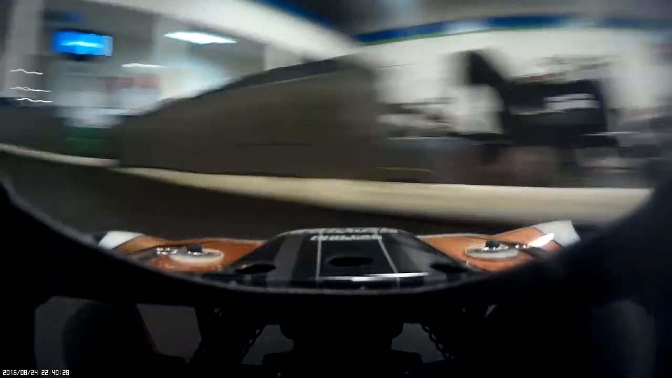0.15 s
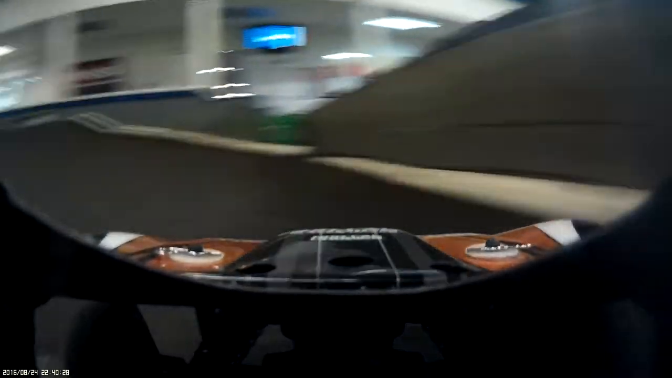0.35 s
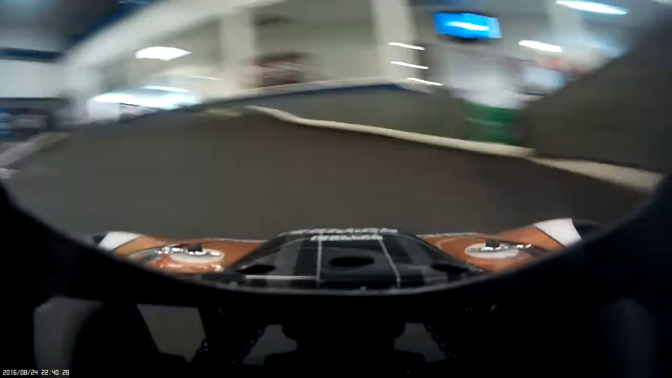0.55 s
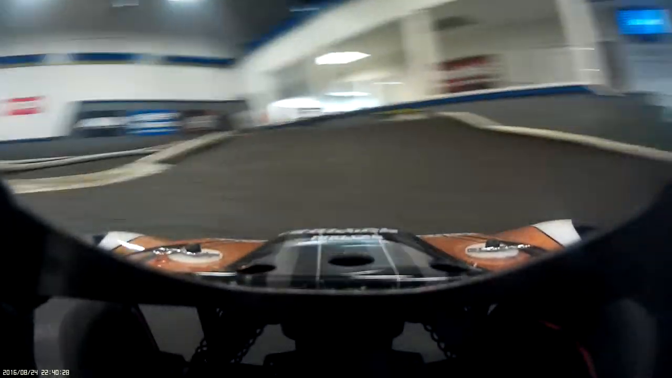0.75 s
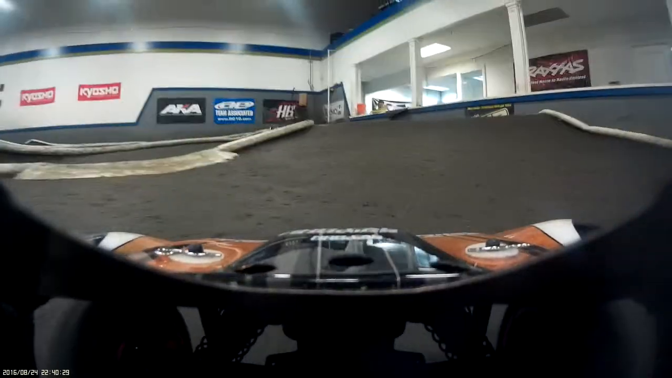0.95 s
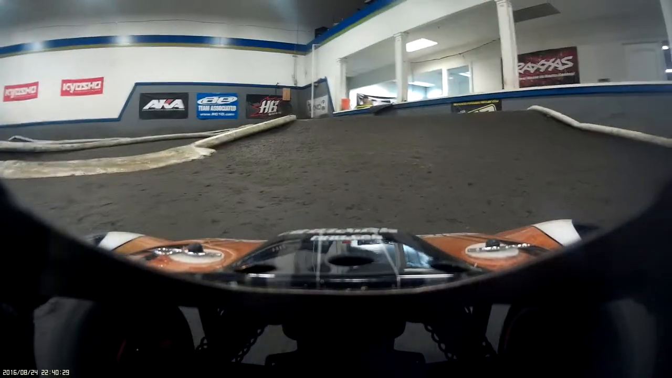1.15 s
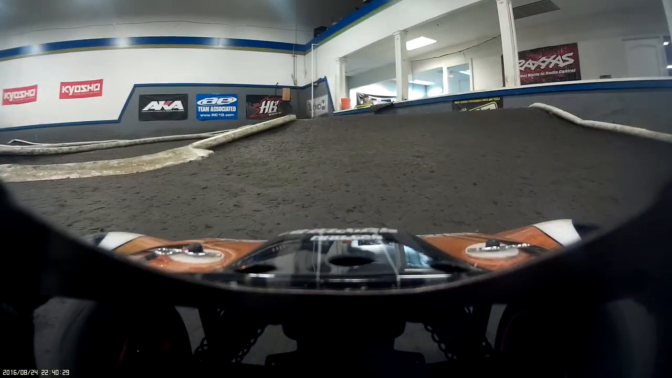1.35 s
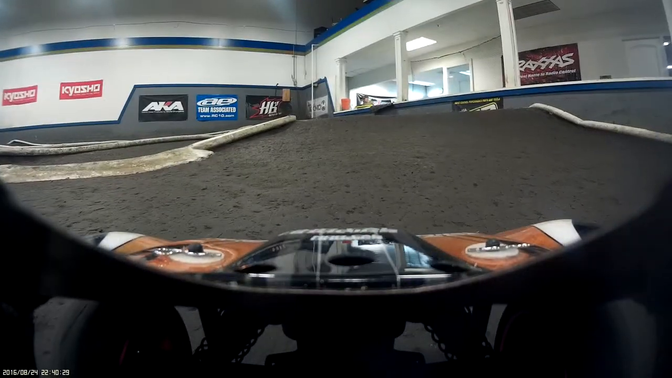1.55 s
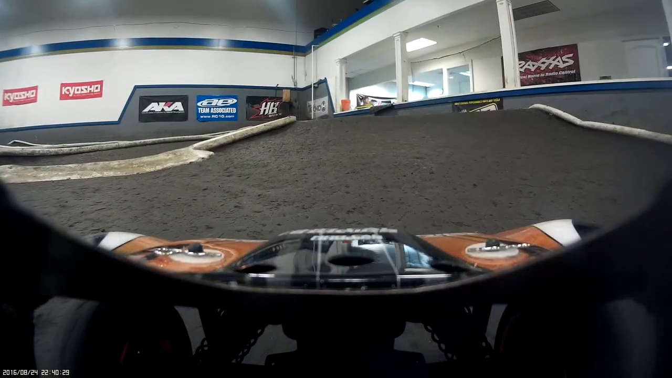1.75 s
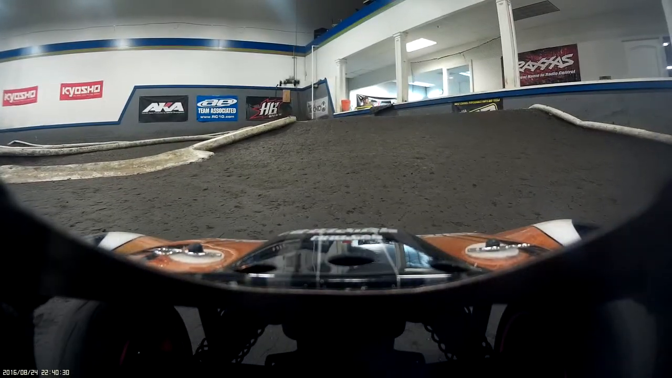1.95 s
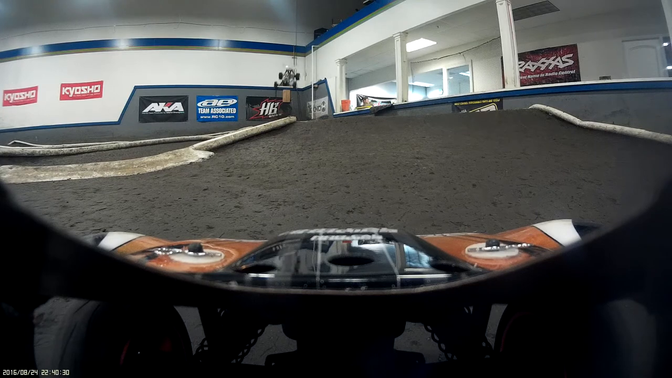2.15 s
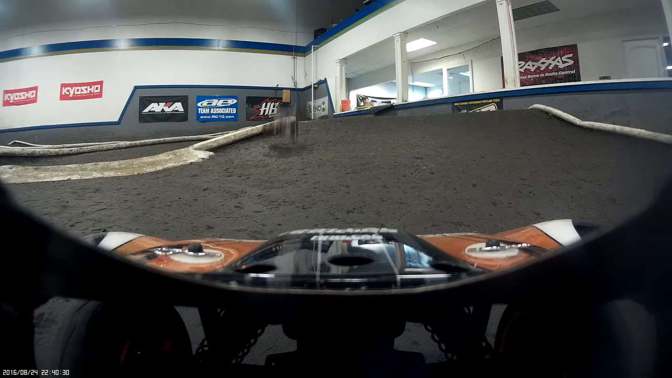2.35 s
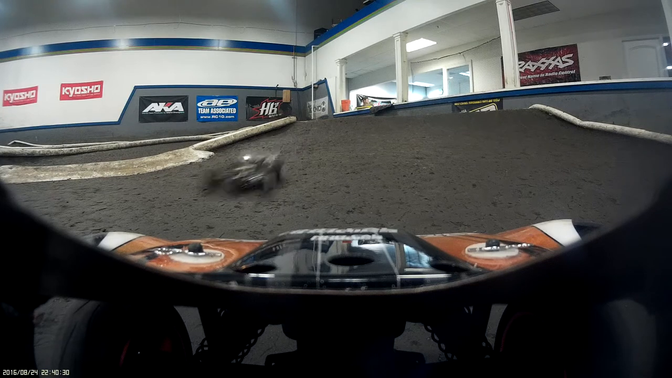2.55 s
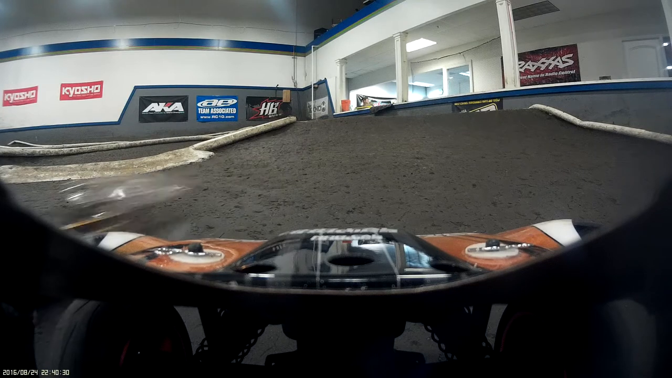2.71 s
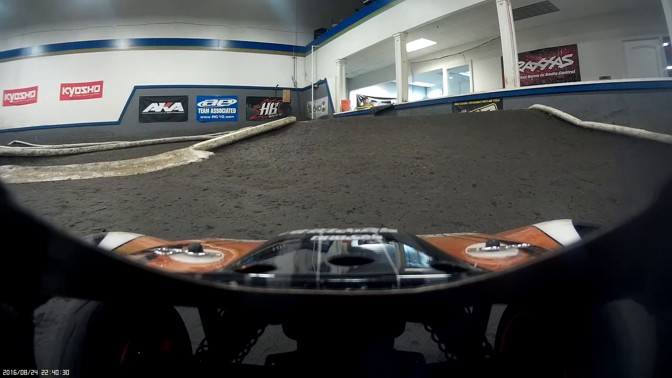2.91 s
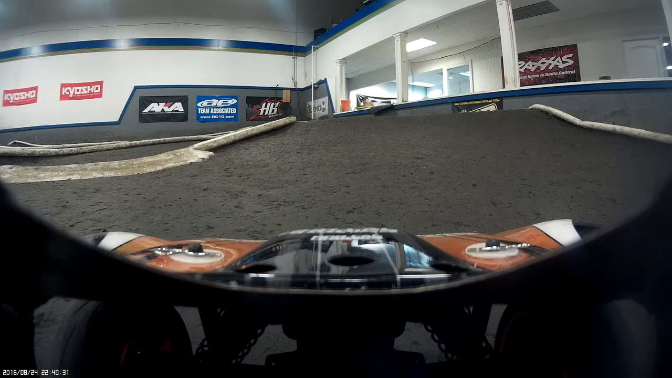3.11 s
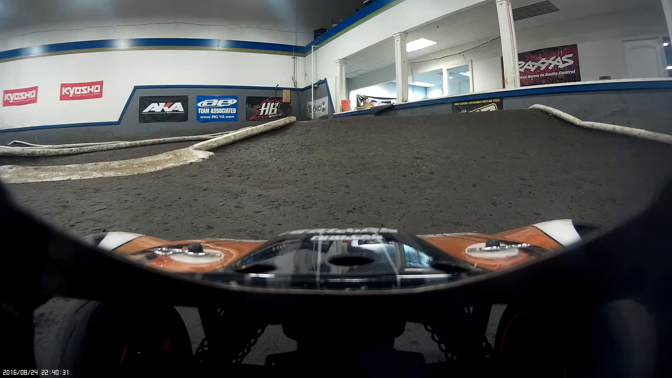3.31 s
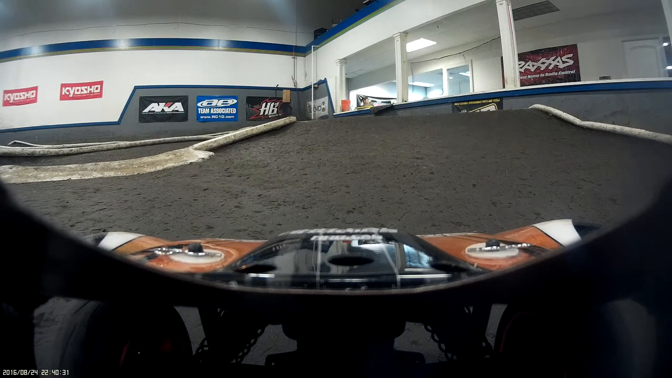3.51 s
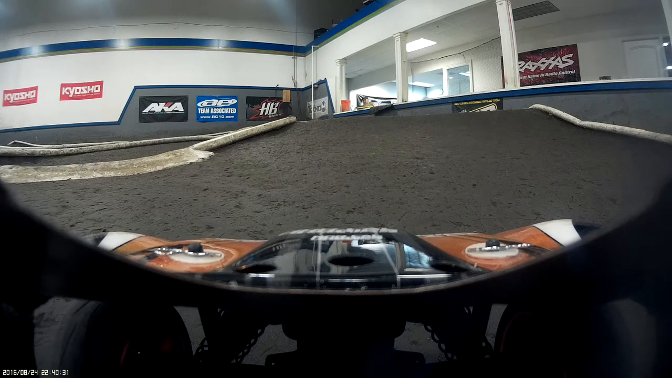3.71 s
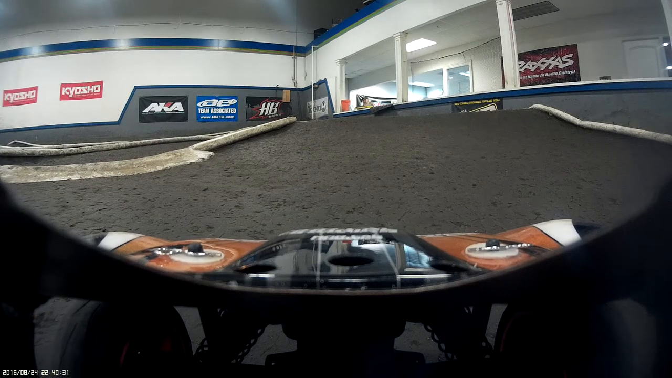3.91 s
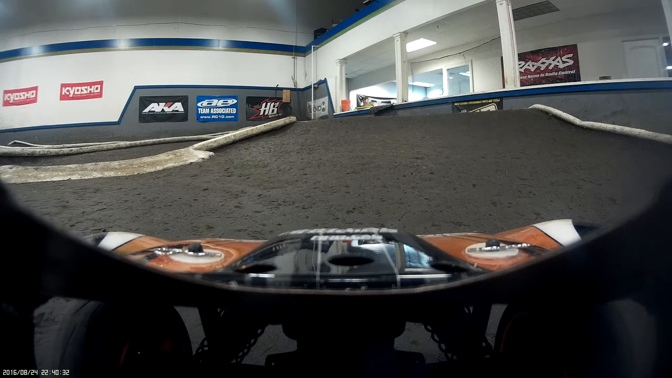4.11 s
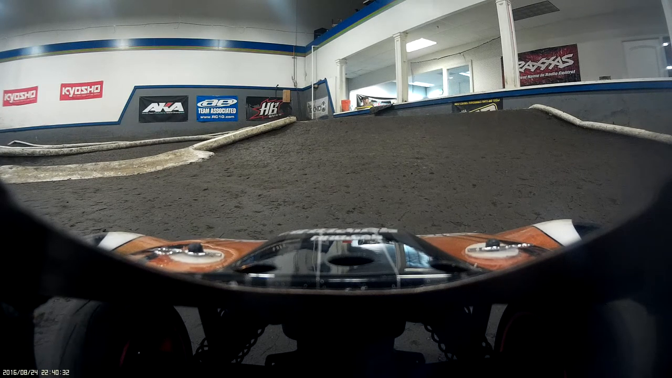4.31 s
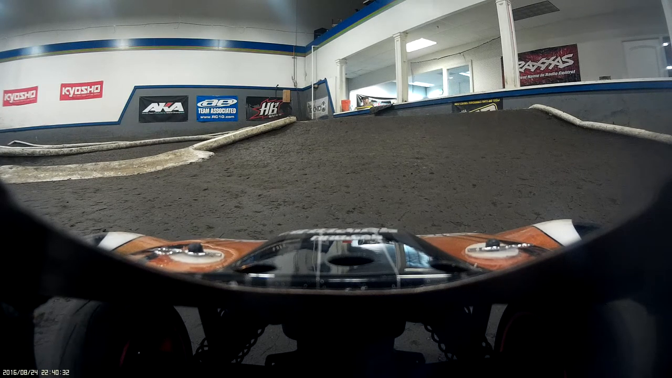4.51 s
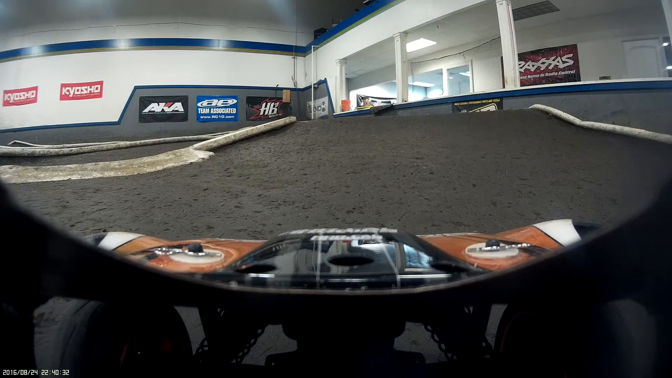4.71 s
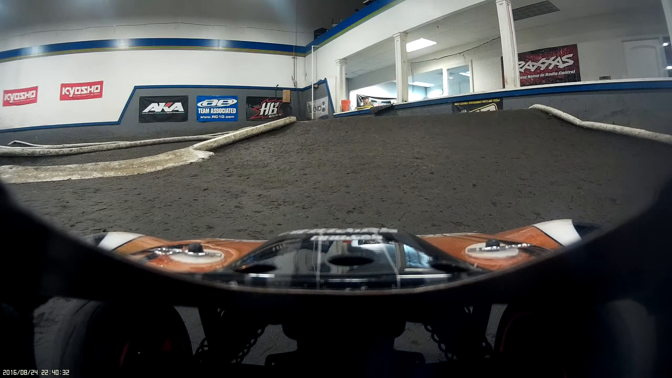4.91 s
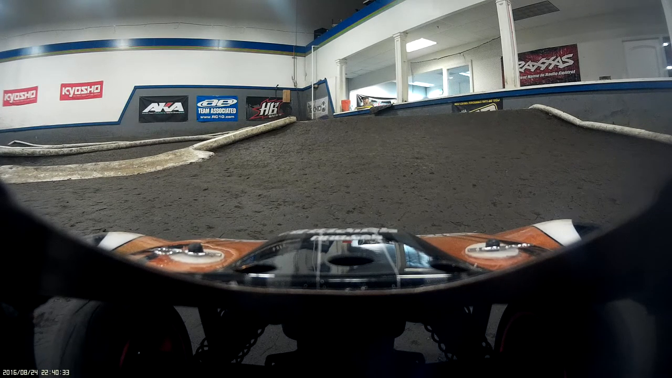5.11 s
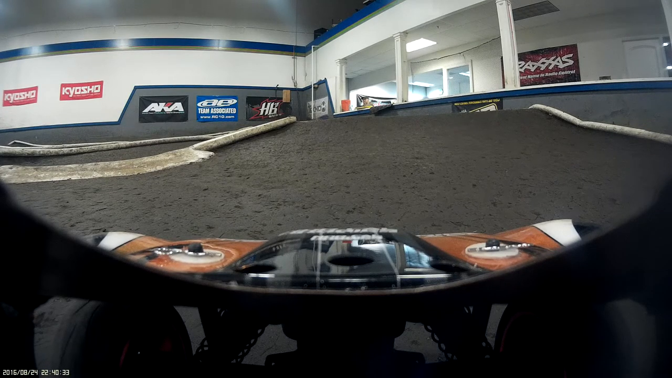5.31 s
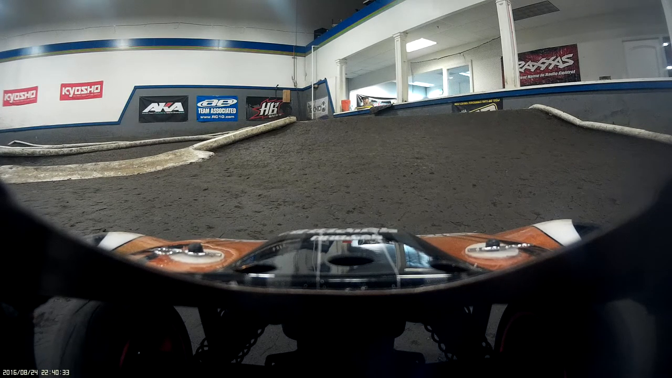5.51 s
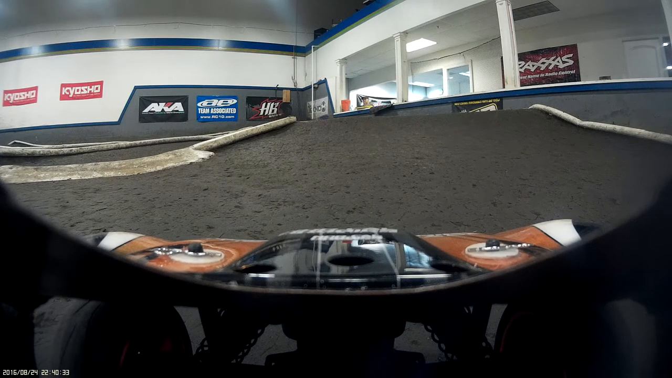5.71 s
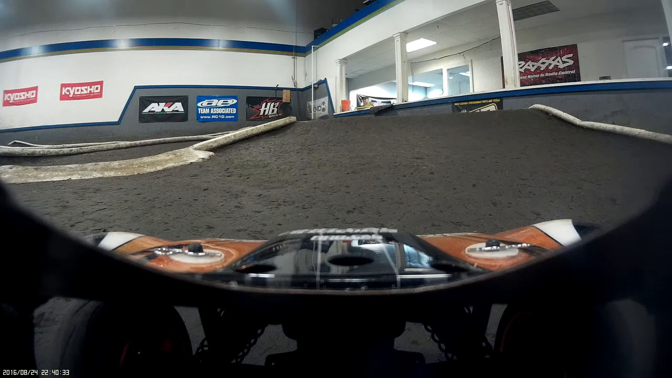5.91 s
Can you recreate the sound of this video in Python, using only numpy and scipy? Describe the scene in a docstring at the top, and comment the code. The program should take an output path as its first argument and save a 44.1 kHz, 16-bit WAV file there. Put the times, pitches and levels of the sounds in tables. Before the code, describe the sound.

Close on the roof of a small electric buggy on an indoor dirt track: booming wind, knocks, rattling grit and shrill gear whine, then a falling whine and braking buzz. The servo chatters briefly and quiet fans hiss. Around 2.5 seconds another buggy thumps down, then cracks against the shell, chirps, and whines away into the hall, leaving faint fan noise.

```python
"""On board an electric model buggy on an indoor dirt track, close-miked by the camera on its roof.
At first wind noise buffets the microphone, grit rattles on the chassis and the gears whine as turning partials.
The buggy then brakes with a motor buzz, its steering servo chatters, and its two fans hum and hiss as it stands.
Then a second buggy lands nearby and clips the shell: shaped noise and ringing plate modes.
Last it whines away in gliding gear tones, with a noise tail for the hall around it."""
import sys
import numpy as np
from scipy import signal
from scipy.fft import rfft, irfft, next_fast_len
from scipy.io import wavfile
from scipy.ndimage import map_coordinates

SR = 44100
rng = np.random.default_rng(int(sys.argv[2]) if len(sys.argv) > 2 else 0)


def wav_record(signal):
    """Record a signal, one row per channel, as 16-bit PCM in the file named by sys.argv[1]."""
    frames = np.transpose(np.atleast_2d(signal))
    bounded = np.clip(frames, -1, 1)
    # unit amplitude maps onto the largest positive 16-bit level
    quanta = np.round(bounded * 32767).astype(np.int16)
    wavfile.write(sys.argv[1], SR, quanta)


N = 262571

# ground speed of the buggy carrying the microphone: (time [s], share of top speed)
GROUND_SPEED = [(0, 0.68), (.14, 0.83), (.33, 0.94), (.54, 0.61), (.67, 0.73), (.74, .4), (.94, 0.34),
                (1.06, 0.15), (1.45, 0.016)]

# wind noise at the microphone: (frequency [Hz], density [dB per Hz])
WIND_SPECTRUM = [(9.4, -27), (16, 11.5), (32, -4), (71, 0), (117, -7), (204, -24), (600, -34), (780, -62),
                 (1320, -120)]
# dull knock as the suspension bottoms out: (frequency [Hz], density [dB per Hz])
KNOCK_SPECTRUM = [(40, -9), (130, 3.5), (260, -8.5), (500, -22), (900, -26), (2000, -57)]
# the suspension bottoms out: (time [s], slow push [dB], push frequency [Hz], knock [dB])
BOTTOMINGS = [(0.127, 2.5, 82, -8), (.312, 4, 33, -7), (0.375, 4.5, 27.3, -18), (0.403, -14, 46.2, -5),
              (.446, -4, 55.5, -29), (0.474, 1, 83, -23), (.506, 3.5, 44.7, -20), (0.537, -4, 49.7, -14),
              (.662, -9.5, 59.6, -20), (2.764, -29, 40, -31)]
WIND_DB, WIND_POWER = -10.5, 3.07  # mean gust at top speed; grows as this power of speed
GUST_DB, GUST_RATE = 3, 22.33  # scale of the wind's lumps [dB], random lumps per second
DIAPHRAGM_TRAVEL = .72  # soft limit of the wind and knocks [full scale]

# grit drumming on the chassis: (frequency [Hz], density [dB per Hz])
CHASSIS_SPECTRUM = [(210, -28.5), (350, -21), (633, -22.5), (707, -13.5), (734, -17), (798, -8.5), (996, 3),
                    (1320, -5.5), (1460, -1.5), (1840, -7.5), (2090, -15), (3200, -42), (4160, -54),
                    (7040, -120)]
# grit spraying off the chassis: (frequency [Hz], density [dB per Hz])
GRIT_SPECTRUM = [(1500, -44), (2200, -11), (3000, 0), (3260, -4.5), (3930, 4), (4480, -7), (5450, 5.5),
                 (6470, -3.5), (8400, -11), (9500, -27), (13000, -16), (15500, -15)]
# ruts shake the chassis: (time [s], rattle level [dB], swell length [s])
RUT_RATTLES = [(.005, -15, 0.019), (.117, -11.5, 0.023), (.38, -12, 0.0025), (.456, -17.5, 0.0061),
               (.49, -12.5, 0.014), (.539, -20, 0.0027), (.614, -13, 0.0055), (.654, -12.5, 0.012),
               (.739, -12, 0.02), (.811, -15, 0.024), (.855, -13, 0.025), (1.104, -23, 0.01),
               (1.178, -19, 0.017), (1.25, -25, 0.014), (1.376, -26.5, 0.0043), (1.418, -13, 0.0011)]
RATTLE_POWER, SPRAY_POWER = 0.38, 1.18  # the tyre noises grow as these powers of speed
ROLL_DB, SPIN_DB, SCRUB_DB = -21.5, -21, -18  # rattle gains for rolling, wheelspin and braking, at top speed
ROLL_SPRAY_DB, SPIN_SPRAY_DB, SCRUB_SPRAY_DB = -28.5, -20.5, -18  # spray gains for the same three

# the driver's commands: (start [s], end [s], attack [s], release [s])
THROTTLE = (0.095, 0.338, .014, 0.036)
FULL_POWER = (0.14, 0.279, 0.033, 0.01)
BRAKING = (0.758, 1.5, 0.093, 0.13)
STEERING = (1.25, 1.81, 0.57, 0.016)

# gear mesh under throttle, flaring as the wheels hop: (time [s], pitch [Hz])
MESH_PITCH = [(.1, 1480), (.117, 1679), (.13, 1030), (.143, 1517), (.172, 1236), (.192, 1231), (.222, 1618),
              (.252, 1240), (.279, 1434), (.31, 1170)]
# gear partials under throttle: (multiple of mesh pitch, level [dB])
GEAR_PARTIALS = [(1, 0), (2, -13.5), (4, -20)]
# motor buzz under braking: (multiple of buzz pitch, level [dB])
BRAKE_PARTIALS = [(1, -2.5), (2, 1.5), (4, -19), (5, -31), (7, -13)]
WHINE_DB, WHISTLE_DB = -12, -19.5  # gears and speed controller under power
RUN_DOWN = (.84, 1.053, .025, 0.12)  # gears sing while slowing: start, end, attack, release [s]
CREST_S, CREST_HZ, RISE_HZ_PER_S, SAG_HZ_PER_S = .892, 1285, 4000, 3550  # their pitch crests, then sags
RUN_DOWN_DB = -13.5
BRAKE_DB, BRAKE_FADE_DB_PER_S = -24, 10  # the pulsed brake buzzes in the motor

# resonances of the servo case: (frequency [Hz], width [Hz], level [dB])
SERVO_MODES = [(1460, 48, 9), (2056, 51, 6.5), (2560, 150, -13), (6900, 100, -1), (7600, 100, -5),
               (8050, 110, -16)]
SERVO_DB = -23  # at full effort

# the other buggy strikes the ground, then the shell: (time [s], thud [dB], crack [dB], 60 dB decay [s])
STRIKES = [(2.435, -23.5, -12.5, 0.16), (2.451, -15, -21, 0.17), (2.475, -24.5, -26, 0.12),
           (2.762, 0, -8, 0.031), (2.782, -39, -38, 0.031)]
# chassis plate modes: (frequency [Hz], level before a small scatter [dB], 60 dB decay [s])
PLATE_MODES = [(135, -19, 0.12), (337, -10.5, 0.082), (488, -5, 0.055), (613, -5, 0.04), (685, 3, 0.043),
               (1200, -6, 0.013)]
# scuffed dirt, also the rumble of the passing buggy: (frequency [Hz], density [dB per Hz])
DIRT_THUD = [(50, -60), (90, -16), (140, -2), (220, -15), (330, -2), (480, -5), (660, -4.5), (900, -1),
             (1250, -6.5), (2000, -6), (6000, -42)]
# crack of the plastic shell: (frequency [Hz], density [dB per Hz])
SHELL_CRACK = [(100, -67), (400, -12), (1300, -9), (1900, 4), (2700, -13), (4000, -3), (6000, -10),
               (9000, -20), (15000, -15)]

# throttle blips of the other buggy:
# (time [s], pitch [Hz], glide [Hz per s], swell length [s], level [dB], roughness [share])
THROTTLE_BLIPS = [(2.779, 2200, -15000, 0.012, -18, .6), (2.826, 1950, 0, 0.023, -12.5, 1.06),
                  (2.873, 2080, -7000, .022, -19, 0.25), (2.953, 2060, 7000, 0.02, -21.5, 0.44),
                  (3.022, 2080, 5002, 0.02, -21, 0.6), (3.084, 1560, 2, .03, -25, 0.18),
                  (3.25, 1400, 0, 0.019, -21, 0.23), (3.3, 1518, 1999, 0.017, -23, .2),
                  (3.856, 2746, -5000, 0.038, -23.5, 0.29), (5.21, 1700, 1400.5, 0.038, -22.5, 0.2)]
BLIP_DRIFT = .07  # pitch scatter at a roughness of 1
# its gear mesh as it pulls away: (time [s], pitch [Hz])
PULL_AWAY_PITCH = [(3.34, 1850), (3.42, 1940), (3.47, 2110), (3.55, 3400), (3.575, 2960), (3.595, 2880),
                   (3.65, 2520)]
# its body rings louder at some gear pitches: (pitch [Hz], gain [dB])
RIVAL_BODY_GAIN = [(1900, 1.5), (2150, -0.5), (2550, -1), (2880, 2), (3050, -4), (3400, -7)]
# its tyres spray dirt: (time [s], level [dB], swell length [s])
DIRT_SKIDS = [(2.808, -16, 0.012), (2.832, -18, 0.011), (2.866, -24, 0.02), (3.54, -25.5, 0.079),
              (3.855, -27, .04)]
# dirt thrown by those tyres: (frequency [Hz], density [dB per Hz])
DIRT_SPRAY = [(3000, -36), (4500, -2), (5200, 6), (6200, 0.5), (7200, -24), (14000, -43)]
# the other buggy's phases: (start [s], end [s], attack [s], release [s])
NEARBY = (2.47, 3.34, .04, 0.39)  # rolling within earshot
RIVAL_BRAKING = (2.795, 3.08, 0.015, 0.023)
PULL_AWAY = (3.33, 3.67, .025, 0.086)
PULL_DB = -27.5  # before the body gain
PASS_S, PASS_WIDTH_S, PASS_DB = 2.752, 0.048, -24  # closest approach, time to cover that distance, rumble there
RIVAL_BRAKE_DB, RIVAL_BRAKE_FADE_DB_PER_S = -25, 55

# how plainly the fans are heard: (time [s], gain [dB])
FAN_GAIN = [(0, -1), (1.1, -12), (1.5, 1.5), (5.95, 0.44)]
# first fan's hum: (multiple of its pitch, level [dB])
FAN_PARTIALS = [(1, -46), (4, -40), (5, -36.5), (6, -39), (10, -45)]
# second, smaller fan's hum: (multiple of its pitch, level [dB])
SMALL_FAN_PARTIALS = [(.5, -61.5), (1, -50), (1.5, -55), (3.5, -65)]
# fan draught: (frequency [Hz], density [dB per Hz])
FAN_DRAUGHT = [(25, -16), (45, -19), (76, -5), (110, -11), (170, -8), (330, -11.5), (480, -1.5), (900, 1),
               (1300, -7.5), (2300, -2), (3000, -1.5), (9000, -15), (15000, -10)]
# cavity under the body shell: (frequency [Hz], width [Hz], level [dB])
SHELL_CAVITY = [(1490, 126, 3.5), (1873, 136, -10.5), (2630, 65, -15.5), (3506, 144, -9), (3787, 123, -8.5),
                (4152, 174, -7), (4280, 110, -10), (4700, 150, -8), (4936, 107, -14), (5185, 78, -6.5),
                (5570, 71, -25), (5860, 22, -10.5), (7900, 99, -27), (9150, 300, -25.5), (9920, 300, -19.5),
                (12300, 220, -46), (12900, 580, -14.5)]

# treble response of the small microphone: (frequency [Hz], gain [dB])
MICROPHONE_RESPONSE = [(9000, 0), (12500, -7), (14500, -30), (15600, -17)]
TOP_HZ = 15650  # band limit of the camera
OVERLOAD = .71  # its overload ceiling [full scale]


def wind():
    """Air buffets the microphone, steeply with speed; each bottoming-out gives one slow push and a dull knock."""
    gusts = amp(GUST_DB * wobble(GUST_RATE))
    air = amp(WIND_DB) * speed() ** WIND_POWER * gusts * coloured(noise(), WIND_SPECTRUM)
    thud = coloured(noise(), KNOCK_SPECTRUM)
    knocks = np.zeros(N)
    for start, push_db, hz, knock_db in BOTTOMINGS:
        t = np.clip(clock() - start, 0, None)
        air += amp(push_db) * np.sin(2 * np.pi * hz * t) * np.exp(-(hz * t) ** 2)
        knocks += amp(knock_db) * (1 - np.exp(-t / 0.0009)) * np.exp(-t / 0.014) * thud
    # the diaphragm can only move so far
    return DIAPHRAGM_TRAVEL * np.tanh((air + knocks) / DIAPHRAGM_TRAVEL)


def tyres():
    """Clumps of grit drum on the chassis and spray off, more under wheelspin and braking; ruts bring bursts."""
    v, spin, scrub = speed(), held(THROTTLE), held(BRAKING)
    stones = grains(rate=5000, spread_db=1.5) * amp(2.6 * wobble(80))
    drumming = v ** RATTLE_POWER * (amp(ROLL_DB) + amp(SPIN_DB) * spin + amp(SCRUB_DB) * scrub)
    thrown = v ** SPRAY_POWER * (amp(ROLL_SPRAY_DB) + amp(SPIN_SPRAY_DB) * spin + amp(SCRUB_SPRAY_DB) * scrub)
    rattle = drumming * coloured(stones, CHASSIS_SPECTRUM)
    spray = thrown * coloured(stones + noise(), GRIT_SPECTRUM)
    shaken = coloured(noise(), CHASSIS_SPECTRUM) + amp(-7.5) * coloured(noise(), GRIT_SPECTRUM)
    return rattle + spray + swells(RUT_RATTLES) * shaken


def drive():
    """The gears whine; the controller's switching makes the motor whistle under power and buzz when braking."""
    whine = held(THROTTLE) * gears(curve(MESH_PITCH), GEAR_PARTIALS, drift=.014, rasp_db=-9)
    since = clock() - CREST_S
    glide_hz = np.minimum(RISE_HZ_PER_S * since, -SAG_HZ_PER_S * since)
    slowing_hz = np.maximum(CREST_HZ + glide_hz, CREST_HZ / 2)
    # coasting, a second gear pair sings a little above the first
    coast_partials = [(1, 0), (1.24, -10), (2, -23), (3, -25)]
    coast = held(RUN_DOWN) * gears(slowing_hz, coast_partials, drift=.01, rasp_db=-10)
    whistle = held(FULL_POWER) * tone(5934, [(1, 0)], drift=.001, drift_rate=200) * amp(2.5 * wobble(90))
    buzz = tone(754, BRAKE_PARTIALS, drift=.003, drift_rate=60) * amp(2.5 * wobble(45))
    brake = held(BRAKING, BRAKE_FADE_DB_PER_S) * buzz
    return amp(WHINE_DB) * whine + amp(RUN_DOWN_DB) * coast + amp(WHISTLE_DB) * whistle + amp(BRAKE_DB) * brake


def servo():
    """The steering servo chatters in its small case, in quick pulses as it hunts for its position."""
    hunting = amp(3.5 * np.sin(2 * np.pi * 33 * clock() + wobble(8)))
    chatter = grains(rate=6000, spread_db=1) * hunting
    return amp(SERVO_DB) * held(STEERING) * resonate(chatter, SERVO_MODES)


def blows():
    """Each blow rings the chassis plate, scuffs the dirt and cracks the plastic shell."""
    out = np.zeros(N)
    for start, thud_db, crack_db, t60 in STRIKES:
        t = np.clip(clock() - start, 0, None)
        fade = (1 - np.exp(-t / 0.00064)) * amp(-60 * t / t60)
        ring = np.zeros(N)
        for hz, db, life in PLATE_MODES:
            ring += amp(db + rng.normal(0, 1.1) - 60 * t / life) * np.sin(2 * np.pi * hz * t)
        scuff = fade * coloured(noise(), DIRT_THUD)
        out += amp(thud_db) * (amp(-1.0) * ring + amp(2.5) * scuff)
        out += amp(crack_db) * fade * coloured(noise(), SHELL_CRACK)
    # parts this small radiate no deep bass
    out = signal.sosfilt(signal.butter(3, 115, "highpass", fs=SR, output="sos"), out)
    return hall(out, t60=0.95, wet_db=-20.5)


def rival():
    """The other buggy rumbles up, louder as distance shrinks, brakes past, spins its wheels and drives off."""
    distance = np.hypot(1, (clock() - PASS_S) / PASS_WIDTH_S)  # relative to closest approach
    rumble = amp(PASS_DB) * held(NEARBY) / distance * coloured(noise(), DIRT_THUD)
    mesh_hz = curve(PULL_AWAY_PITCH)
    ringing = amp(PULL_DB + np.interp(mesh_hz, *np.transpose(RIVAL_BODY_GAIN)))
    leaving = ringing * held(PULL_AWAY) * gears(mesh_hz, [(1, 0), (2, -15)], drift=.019, rasp_db=-4)
    buzz = tone(1003, [(1, 2.5), (2, -19)], drift=0.0021, drift_rate=83)
    brake = amp(RIVAL_BRAKE_DB) * held(RIVAL_BRAKING, RIVAL_BRAKE_FADE_DB_PER_S) * buzz
    dirt = swells(DIRT_SKIDS) * coloured(grains(rate=6000, spread_db=1.5), DIRT_SPRAY)
    return rumble + hall(blips() + leaving + brake + dirt, t60=.55, wet_db=-13)


def blips():
    """At each blip of the throttle the other buggy's gears swell and glide in pitch."""
    rows = np.array(THROTTLE_BLIPS)
    # each sample follows the blip nearest in time
    nearest = np.abs(clock()[:, None] - rows[:, 0]).argmin(axis=1)
    centre, hz, glide, length, db, rough = rows[nearest].T
    since = clock() - centre
    pitch = np.clip(hz + glide * since, hz / 2, hz * 2)
    swell = amp(db) * np.exp(-(since / length) ** 2)
    return swell * gears(pitch, [(1, 0), (2, -20)], drift=BLIP_DRIFT * rough, rasp_db=-6)


def fans():
    """Two fans hum; their draught and bearing rattle ring under the body shell."""
    hum = tone(253.2, FAN_PARTIALS, drift=0.00387, drift_rate=25)
    small_hum = tone(291, SMALL_FAN_PARTIALS, drift=0.00343, drift_rate=13)
    draught = amp(-33.0) * coloured(noise(), FAN_DRAUGHT)
    rattle = resonate(grains(rate=9000, spread_db=-0.5), SHELL_CAVITY)
    bearing = amp(-24.5) * rattle * amp(0.7 * wobble(35))
    return amp(curve(FAN_GAIN)) * (hum + small_hum + draught + bearing)


def hall(x, t60, wet_db):
    """Direct sound plus the diffuse answer of the hall, a decaying noise tail."""
    t = np.arange(SR) / SR
    tail = rng.standard_normal(SR) * amp(-60 * t / t60)
    return x + amp(wet_db) * signal.fftconvolve(x, tail / np.linalg.norm(tail))[:N]


def gears(hz, orders, drift, rasp_db):
    """Gear whine at rms 1; backlash scatters part of it into a rasp around each partial."""
    mesh = tone(hz, orders, drift, drift_rate=300)
    backlash = amp(rasp_db) * wobble(600)
    return unit(mesh * (amp(2.5 * wobble(90)) + backlash))


def tone(hz, orders, drift, drift_rate):
    """Partials of a turning part whose speed wanders a little."""
    phase = 2 * np.pi * np.cumsum(hz * (1 + drift * wobble(drift_rate))) / SR
    partials = [amp(db) * np.sin(k * phase + rng.uniform(0, 2 * np.pi)) for k, db in orders]
    return np.sqrt(2) * sum(partials)  # levels are rms


def grains(rate, spread_db):
    """Random tiny impacts of uneven size, rate a second on average, at rms 1."""
    hits = rng.random(N) < rate / SR
    return unit(hits * noise() * amp(spread_db * noise()))


def noise():
    """Fresh white noise."""
    return rng.standard_normal(N)


def wobble(rate):
    """A smooth random curve, rate knots a second."""
    return map_coordinates(rng.standard_normal(int(N * rate / SR) + 4), [clock() * rate])


def resonate(x, modes):
    """x rung through (frequency [Hz], width [Hz], level [dB]) resonances, at rms 1."""
    def response(f):
        """Sum of band-pass resonances."""
        return sum(amp(db) * 1j * f * w / (c * c - f * f + 1j * f * w) for c, w, db in modes)
    return unit(filtered(x, response))


def coloured(x, points):
    """x shaped by (frequency [Hz], level [dB]) points, at rms 1."""
    f, db = np.transpose(points)
    return unit(filtered(x, lambda hz: amp(np.interp(np.log(hz + 1), np.log(f), db))))


def filtered(x, response):
    """x times a response of frequency."""
    m = next_fast_len(N + SR // 2)
    return irfft(rfft(x, m) * response(np.fft.rfftfreq(m, 1 / SR)), m)[:N]


def speed():
    """Ground speed per sample, as a share of top speed."""
    return np.maximum(curve(GROUND_SPEED), 0)


def curve(rows):
    """One value per sample from (time [s], value) rows."""
    return np.interp(clock(), *np.transpose(rows))


def held(times, fade_db_per_s=0):
    """Attack, hold and release; the level may fade from the start on."""
    start, end, attack, release = times
    t = clock()
    gate = np.clip(np.minimum((t - start) / attack, (end - t) / release), 0, 1)
    return gate * amp(-fade_db_per_s * np.clip(t - start, 0, end - start))


def swells(rows):
    """A bell-shaped swell for each (time [s], level [dB], length [s]) row."""
    return sum(amp(db) * np.exp(-((clock() - centre) / length) ** 2) for centre, db, length in rows)


def clock():
    """The time of every sample [s]."""
    return np.arange(N) / SR


def unit(x):
    """Scale to rms 1."""
    return x / np.sqrt(np.mean(x ** 2) + 1e-20)


def amp(db):
    """Decibels to gain."""
    return 10 ** (np.asarray(db) / 20)


def scene():
    """Everything as heard from the buggy's roof."""
    on_board = wind() + tyres() + drive() + servo()
    return (on_board + blows() + rival() + fans())[None]


def record(dry):
    """The small microphone dulls the top octave; the camera overloads and keeps nothing above its band limit."""
    f, db = np.transpose(MICROPHONE_RESPONSE)
    heard = filtered(dry[0], lambda hz: amp(np.interp(hz, f, db)))
    clipped = heard / (1 + np.abs(heard / OVERLOAD) ** 8) ** (1 / 8)
    return filtered(clipped, lambda hz: hz < TOP_HZ)[None]


dry = scene()
out = record(dry)
wav_record(out)
```